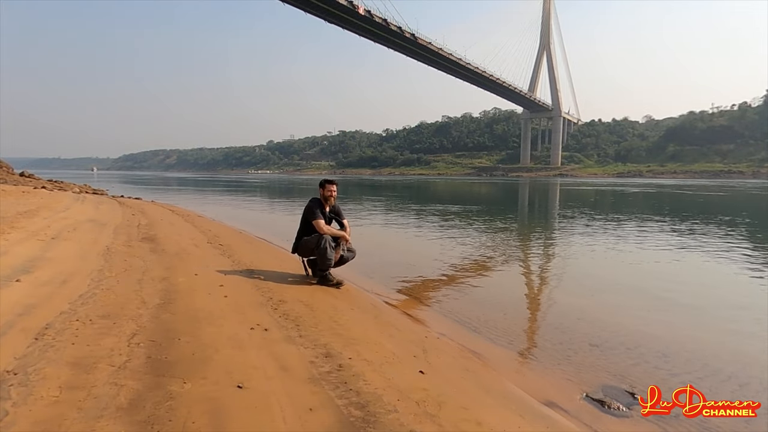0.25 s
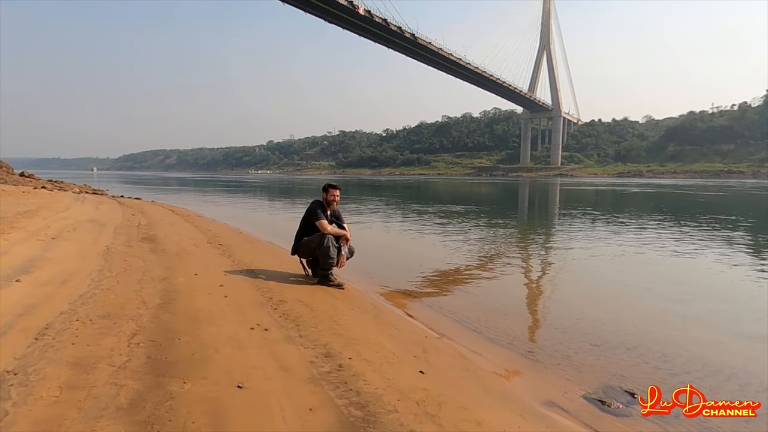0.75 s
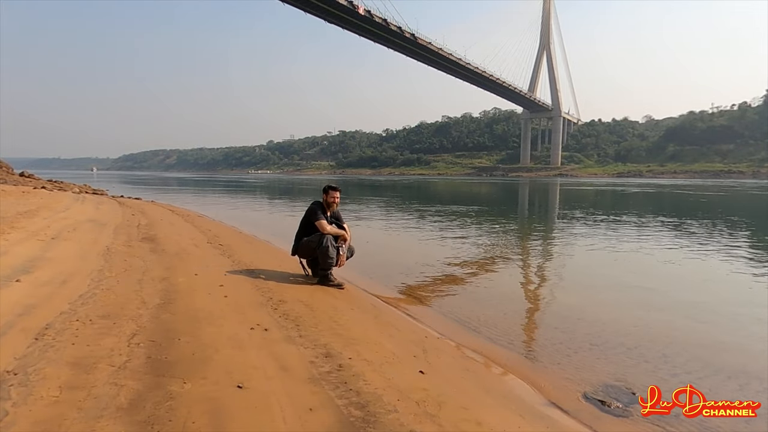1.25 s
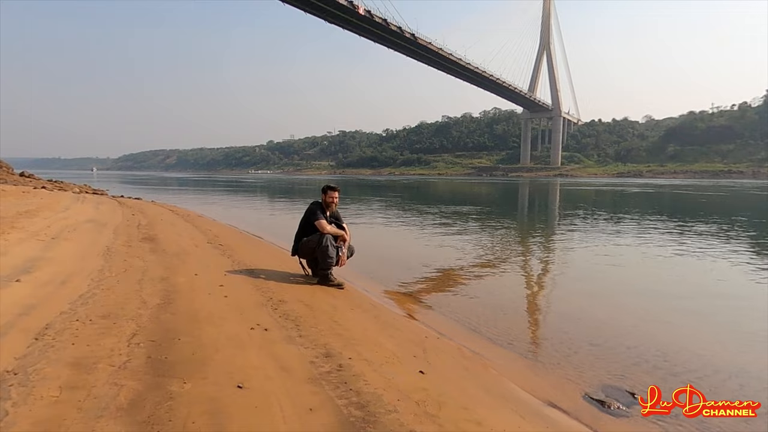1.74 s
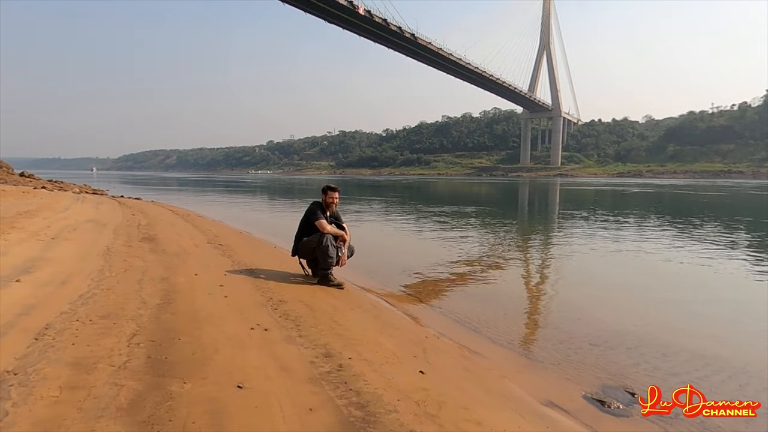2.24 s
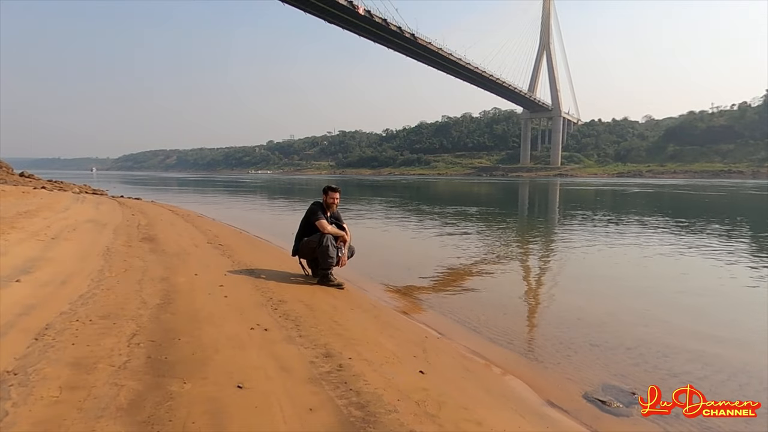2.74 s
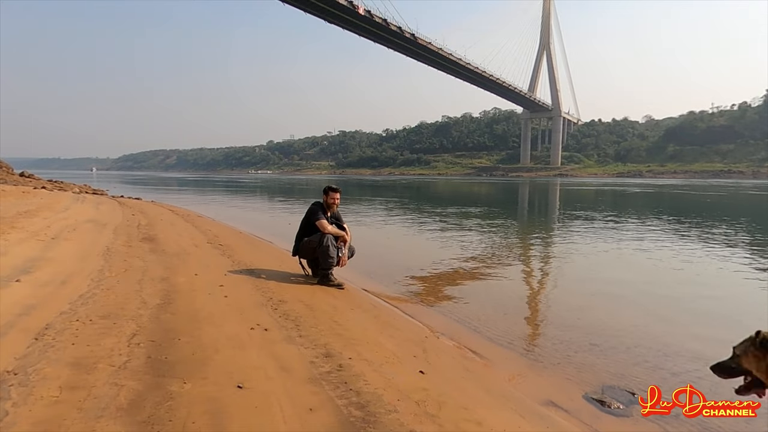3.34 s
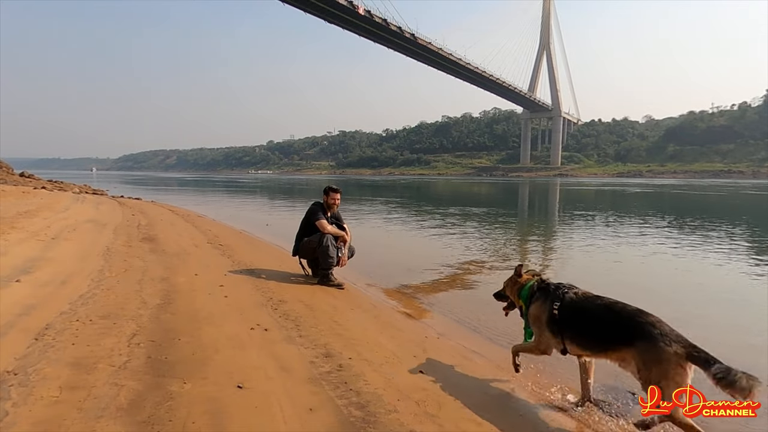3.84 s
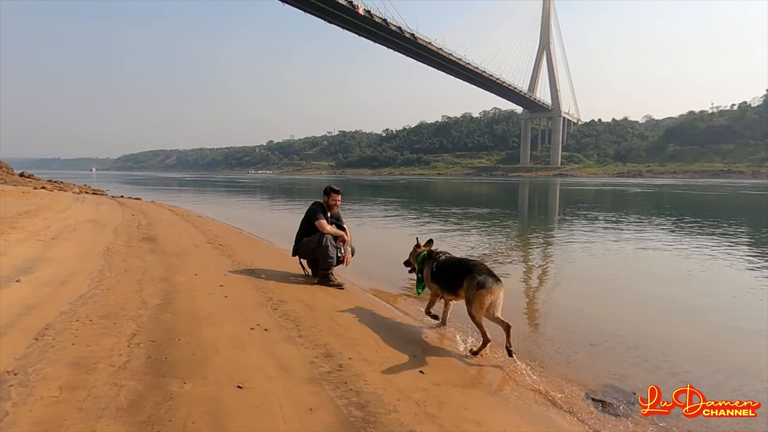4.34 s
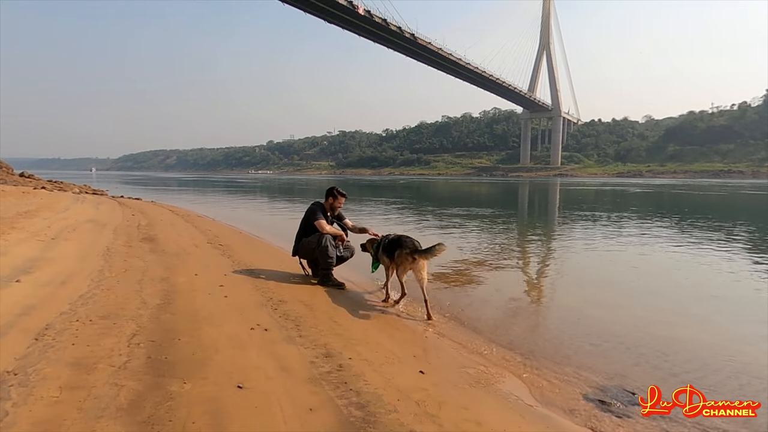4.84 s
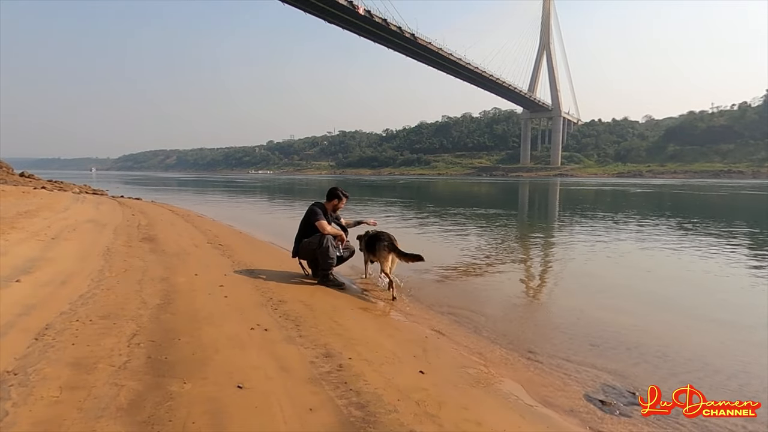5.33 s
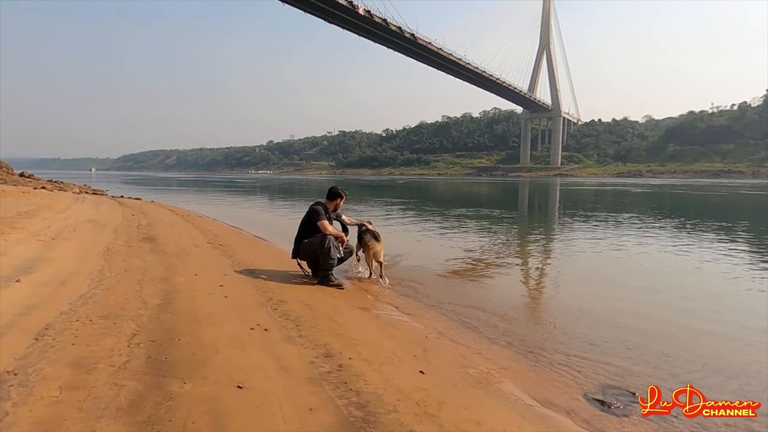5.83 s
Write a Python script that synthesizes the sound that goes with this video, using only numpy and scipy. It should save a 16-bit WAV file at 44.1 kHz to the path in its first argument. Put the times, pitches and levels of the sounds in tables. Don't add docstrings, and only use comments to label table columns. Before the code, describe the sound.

A steady, deep, soft rumble of distant bridge traffic runs throughout, with a faint wavering engine hum and a very quiet river hiss. In front of it a dog moves through shallow water, heard close and to the right. From 0 to 2 seconds there are small separate splashes: a paw slap at 0.1, a crisp drop at 0.4, a firmer slap and low bubbles at 0.8, a gulping plop around 1.25, then light spray and drips. At about 2.3 a hard, sharp slap stands out, followed by ringing plops near 2.6 and 2.95. Splashing thickens from 3 to 4 seconds, with patter, chirping bubbles and bright drops, the strongest smack at 4.0. Meanwhile the sound swings toward the centre. After 4.2 it thins into softer sloshes straight ahead, with a clear bubble plop at 4.6 and scattered drips and gurgles until 6 seconds.

```python
import sys
import numpy as np
from scipy import signal
from scipy.fft import rfft, irfft, next_fast_len
from scipy.io import wavfile
from scipy.ndimage import uniform_filter1d

SR = 44100
rng = np.random.default_rng(int(sys.argv[2]) if len(sys.argv) > 2 else 0)


def how_loud(loudness_db):
    steps = np.asarray(loudness_db, float) / 20
    return 10 ** steps


def waveform_to_disk(signal):
    frames = np.transpose(np.atleast_2d(signal))
    scaled = np.clip(frames, -1, 1) * 32767
    samples = np.round(scaled).astype(np.int16)
    wavfile.write(sys.argv[1], SR, samples)


N = 268128

# (time [s], left minus right [dB])
SIDEWAYS = [
    (0.0, -5.5),
    (0.3, -5.0),
    (0.95, -5.5),
    (2.12, -4.0),
    (2.29, -5.0),
    (3.4, -4.0),
    (4.21, -0.5),
    (6.08, -0.5),
]
# (time [s], peak level [dB], pitch [Hz], life [cycles])
BIG_BUBBLES = [(0.072, -43.5, 790, 6.2), (0.451, -50, 545, 13), (0.467, -40, 550, 5.4),
               (0.472, -46, 820, 5), (0.493, -45, 1190, 6), (0.509, -38.5, 694, 8.6), (0.522, -44, 620, 12),
               (0.702, -41.5, 433, 1.8), (0.825, -34.5, 415, 6.6), (0.858, -41, 420, 9),
               (0.877, -42.5, 417, 26), (0.879, -34, 703, 5.8), (1.194, -38, 684, 16), (1.18, -49, 990, 16),
               (1.2223, -31.5, 1000, 7), (1.23, -35, 1050, 10), (1.24, -38, 523, 7.2),
               (1.262, -38.5, 590, 9), (1.297, -46, 1080, 10), (1.631, -37, 485, 2), (1.919, -40, 980, 8.2),
               (1.945, -33.5, 660, 3.8), (2.533, -34, 1020, 5.8), (2.237, -41.5, 880, 9),
               (2.584, -49, 860, 14), (2.598, -35, 882, 37), (2.62, -23.5, 940, 4.5), (2.93, -37, 687, 7.6),
               (2.942, -35, 647, 8.9), (2.9499, -29, 972, 7.7), (2.976, -43, 780, 7.2),
               (3.036, -43.5, 725, 20), (3.117, -39, 650, 33), (3.323, -39.5, 1090, 23),
               (3.449, -39, 806, 18), (3.847, -34, 845, 13), (4.017, -33.5, 1060, 11),
               (4.614, -30, 1460, 3.8), (4.626, -38, 1530, 10), (4.634, -24, 1440, 10),
               (4.643, -32, 1150, 10), (4.654, -41, 1510, 9.4), (4.666, -51, 1490, 8.3),
               (4.966, -30, 675, 1.3), (5.369, -38.5, 1000, 23), (5.419, -37, 1250, 5.2),
               (5.768, -41, 1080, 4.1), (5.813, -35, 800, 5.5), (5.842, -35.5, 890, 3.6)]
# (time [s], peak level [dB], pitch [Hz])
SMALL_BUBBLES = [(0.0717, -33.5, 1350), (0.126, -37, 1500), (2.16, -30, 1800), (2.259, -25.5, 1370),
                 (2.273, -23, 2510), (2.539, -26, 2320), (2.6248, -22, 1430), (3.12, -23, 1730),
                 (3.1487, -21, 1510), (3.274, -24, 2330), (3.4389, -16.5, 1900), (3.7105, -18.5, 2550),
                 (3.7197, -22, 2330), (3.7217, -24, 1760), (4.023, -23, 1700), (4.0378, -21.5, 1810),
                 (2.1935, -28, 3600), (3.7321, -12.5, 2500), (3.804, -28, 1470), (3.849, -27.5, 1330),
                 (3.896, -23, 1450), (3.9885, -16, 2260), (4.0082, -14, 1580), (4.312, -22, 2120),
                 (4.506, -23, 2200), (3.984, -17.5, 2000), (4.806, -27, 2390), (4.9062, -29, 2430),
                 (5.6982, -24, 2150), (5.831, -24.5, 1890), (5.921, -24, 1660), (5.9446, -22, 1880)]
# (time [s], peak level [dB], pitch [Hz], decay [ms])
DROPS = [(0.073, -16.5, 3740, 23), (0.3993, -7, 4030, 2.7), (0.64, -26, 3800, 48),
         (0.8322, -13.5, 3330, 15), (1.1306, -16, 3220, 22), (1.3954, -18, 4150, 21),
         (1.8148, -15, 4570, 4.9), (1.947, -19, 4710, 3.7), (2.0318, -9, 5900, 2.9),
         (2.1293, -7.5, 5300, 7.3), (2.183, -11.5, 3930, 16), (2.272, -4, 3740, 7.7),
         (2.4992, -11, 3720, 18.5), (2.62, -15, 5100, 16), (2.789, -11, 5130, 6.5), (3.046, -10, 3630, 7.6),
         (3.0966, -11, 3600, 13), (3.391, -4.5, 3640, 11), (3.4685, -8, 4350, 3.2), (3.616, -6, 3640, 2),
         (3.713, -3.5, 3480, 2), (3.895, -10, 3400, 1.5), (3.993, 2, 3480, 1.6), (4.0642, -11.5, 2960, 1.9),
         (4.108, -16, 3850, 2.9), (4.4164, -17.5, 5550, 5.3), (4.568, -21, 3000, 5.5),
         (5.243, -12, 5360, 4.9), (5.8213, -9.5, 5200, 2.8), (6.033, -16, 2800, 8.8)]
# (frequency [Hz], level [dB])
SCATTER = [(30, -14), (70, -27.5), (130, -42), (300, -29), (700, -18), (1400, -14), (4000, -19.5),
           (7000, -16), (8500, -2.5), (14000, -1.5)]


def in_time(rows):
    s, *columns = np.transpose(rows)
    return [np.interp(np.arange(N) / SR, s, column) for column in columns]


def at_hz(points, hz):
    point_hz, value = np.transpose(points)
    return np.interp(np.log(hz), np.log(point_hz), value)


def rms_one(x):
    return x / np.sqrt(np.mean(x ** 2) + 1e-20)


def drift(rate):
    r = np.exp(-80 * np.pi * rate / SR)
    slow = signal.lfilter([1], [1, -2 * r, r * r], rng.standard_normal(N // 40 + 2002))[2000:]
    return np.interp(np.arange(N) / 40, np.arange(len(slow)), rms_one(slow))


def band(x, low, high):
    return signal.sosfilt(signal.butter(2, [low, high], "band", fs=SR, output="sos"), x)


def coloured(x, gains):
    size = next_fast_len(N + 2048)
    hz = np.arange(size // 2 + 1) * SR / size + 1
    return irfft(rfft(x, size) * gains(hz), size)[..., :N]


def add(out, s, sound):
    i = max(round(s * SR), 0)
    out[i:i + len(sound)] += sound[:N - i]


def grains(per_s, spread_db):
    sizes = how_loud(spread_db * np.minimum(rng.exponential(1, N), 4))
    return sizes * (rng.random(N) < per_s / SR)


def swells(s, rise_s, fall_s, db):
    edge_db, roundness = 12.5, 1.72
    t = np.arange(0, N + 32, 32)[:, None] / SR - s
    x = np.where(t < 0, -t / rise_s, t / fall_s)
    return np.sum(how_loud(db - edge_db * x ** roundness) ** 2, axis=1)


def churned_db():
    # (crest time [s], rise [s], fall [s], level [dB])
    gulps = [(.08, 0.033, 0.025, -55), (.465, 0.025, 0.023, -40), (.52, 0.012, 0.013, -38),
             (.75, 0.062, 0.021, -48), (.86, 0.061, 0.071, -35), (1.13, 0.0073, 0.016, -35),
             (1.249, 0.046, 0.034, -26.5), (1.51, 0.12, 0.23, -39), (1.64, 0.029, 0.056, -30),
             (1.95, 0.19, 0.04, -35), (2.14, 0.2, 0.17, -45), (2.265, 0.039, 0.014, -29),
             (2.52, 0.34, .05, -41.5), (2.62, 0.067, 0.054, -32.5), (2.86, 0.2, 0.044, -39.5),
             (2.95, 0.13, 0.1, -36), (3.12, 0.06, 0.13, -36.5), (3.33, 0.34, 0.23, -47),
             (3.45, 0.09, 0.08, -38), (3.77, 0.2, 0.067, -42), (3.86, 0.12, 0.023, -39.5),
             (4.01, 0.13, 0.03, -41), (4.64, 0.024, 0.13, -46.5), (4.995, 0.021, 0.031, -39),
             (5.38, 0.029, 0.035, -38), (5.65, 0.089, 0.25, -43), (5.83, 0.25, 0.036, -40.5),
             (6.02, 0.14, 0.038, -44.5)]
    # (crest time [s], rise [s], fall [s], spray level [dB], slosh level [dB])
    thrown_sheets = [(.1, 0.0075, 0.087, -45.5, -44.5), (0.321, 0.03, 0.059, -36.5, -58),
                     (.45, 0.14, 0.17, -44, -46), (0.719, 0.043, 0.031, -34.5, -49), (.85, 0.17, 0.11, -41.5, -44),
                     (1.0, 0.062, 0.09, -48.5, -50.5), (1.13, 0.084, 0.17, -40, -46),
                     (1.23, 0.03, 0.12, -39, -45.5), (1.41, 0.039, 0.024, -39, -47.5),
                     (1.5, 0.068, 0.12, -37, -46.5), (1.68, 0.18, 0.15, -42, -50), (1.85, 0.087, 0.15, -35.5, -44),
                     (2.02, 0.075, 0.22, -50, -55), (2.17, 0.077, 0.21, -41.5, -47),
                     (2.27, 0.051, 0.028, -38, -55), (2.468, 0.016, 0.14, -36.5, -39.5),
                     (2.63, 0.11, 0.11, -41.5, -48), (2.822, 0.098, 0.16, -35.5, -39),
                     (3.12, 0.14, 0.082, -31.5, -34),
                     (3.31, 0.096, 0.045, -37.5, -39.5), (3.429, 0.11, 0.079, -33.5, -36.5),
             (3.435, 0.051, 0.012, -47, -29), (3.715, 0.018, 0.019, -32, -42),
             (3.6, 0.16, 0.18, -42, -37.5), (3.719, 0.11, 0.086, -37, -36.5),
             (3.82, 0.029, 0.052, -49.5, -45), (3.91, 0.063, 0.1, -41, -42),
             (4.0, 0.041, 0.052, -37.5, -29), (4.14, 0.098, 0.056, -49, -42),
             (4.292, 0.12, 0.068, -37.5, -38), (4.43, 0.087, 0.038, -52.5, -39),
             (4.51, 0.03, 0.025, -43.5, -51), (4.6, 0.054, 0.07, -40.5, -32.5),
             (4.775, .012, 0.071, -50.5, -50), (4.889, 0.14, 0.11, -42, -37), (5.0, .06, 0.049, -49.5, -41),
             (5.259, 0.15, 0.089, -45.5, -38), (5.4, 0.093, 0.065, -47, -32),
             (5.49, 0.02, 0.0081, -52, -50), (5.64, 0.17, 0.12, -45, -38.5), (5.83, 0.11, 0.1, -47, -35),
             (5.94, 0.036, 0.12, -46, -50), (6.039, 0.042, 0.051, -45, -32.5)]
    calm_levels = [-64, -67.5, -63.5]
    stir_levels = [-2.5, -11.5, -36.5]
    slosh_lag_s, stir_rise_s, stir_fall_s = 0.017, 0.003, 0.025
    near_gain = 1.98

    s, rise_s, fall_s, spray_db, slosh_db = np.transpose(thrown_sheets)
    gulp = swells(*np.transpose(gulps))
    slosh = swells(s + slosh_lag_s, rise_s, fall_s, slosh_db)
    spray = swells(s, rise_s, fall_s, spray_db)
    pan_db, = in_time(SIDEWAYS)
    singles = [BIG_BUBBLES, SMALL_BUBBLES, DROPS]
    out = []
    for paw, rows, stir_db, calm_db in zip([gulp, slosh, spray], singles, stir_levels, calm_levels):
        s, db = np.transpose(rows)[:2]
        power = paw + swells(s, stir_rise_s, stir_fall_s, db + stir_db)
        power = np.interp(np.arange(N) / 32, np.arange(len(power)), power)
        calm = how_loud(calm_db - near_gain * pan_db) ** 2
        out.append(10 * np.log10(power + calm))
    return np.array(out)


def churn_db(layers_db, hz):
    centres_hz = [750, 1850, 4500]
    # (frequency [Hz], level per Hz [dB])
    water_colour = [(400, -5), (800, -3), (1300, 0), (2000, -2.5), (2800, -5), (3600, -3), (5500, -5.5),
                    (8000, -10), (16000, -14.5)]
    place = np.interp(np.log(hz), np.log(centres_hz), [0, 1, 2])
    level_db = sum(np.maximum(1 - abs(place - i), 0) * layer for i, layer in enumerate(layers_db))
    width_hz = np.interp(place, [0, 1, 2], [750, 1600, 3300])
    return level_db + at_hz(water_colour, hz) - 10 * np.log10(width_hz)


def churn(layers_db):
    # (frequency [Hz], level [dB])
    sheet = [(500, -8), (2000, -5), (4000, -1.5)]
    edges = 400 * 2 ** np.arange(0, 5.4, 1 / 3)
    clump = how_loud(2.87 * drift(45))
    drops = grains(220 * clump, spread_db=1.5)
    patter = signal.lfilter([1], [1, -how_loud(-60 / (0.036 * SR))], drops)
    white = rng.standard_normal((2, N)) * (rms_one(patter) * 0.48 + 0.47 * clump)
    out = 0
    for k, (low, high) in enumerate(zip(edges, edges[1:])):
        level_db = churn_db(layers_db, np.sqrt(low * high)) + at_hz(sheet, high) + 2.74 * drift(27)
        out = out + how_loud(level_db) * np.sqrt(high - low) * rms_one(band(white[k % 2], low, high))
    return out


def bubble(db, hz, cycles, rise):
    onset_cycles = 2.2
    turns = np.arange(round(cycles / hz * SR)) * hz / SR
    phase = 2 * np.pi * turns * (1 - rise / 4 + rise * turns / cycles)
    fading = how_loud(db - 60 * np.maximum(turns - onset_cycles, 0) / cycles)
    return fading * np.sin(phase) * np.minimum(turns / onset_cycles, 1)


def single_bubbles():
    # (time [s], peak level [dB], pitch [Hz])
    splash_bubbles = [(0.325, -29, 4310), (0.725, -29, 3500), (0.83, -31.5, 1370), (1.4193, -32, 3020),
                      (1.4706, -29, 5030), (1.5257, -30, 4600), (1.717, -31.5, 3380), (1.796, -33, 5250),
                      (2.1833, -35, 2040), (2.2337, -27, 4220), (2.4755, -26, 5770), (2.6207, -29, 3250),
                      (2.6369, -30, 3220), (2.6496, -31, 4070), (2.777, -38, 1200), (2.7905, -30, 2080),
                      (2.8086, -24, 5770), (2.8087, -24, 4910), (2.8126, -25, 3700), (2.8856, -38, 5340),
                      (3.0478, -25, 6630), (3.0975, -27, 5430), (3.1483, -32, 2410), (3.152, -25, 3360),
                      (3.2144, -34.5, 1270), (3.2397, -34, 2080), (3.285, -34, 1400), (3.308, -36, 3300),
                      (3.3423, -29, 4740), (3.393, -31.5, 1810), (3.4026, -22, 3880), (3.4152, -33, 1800),
                      (3.423, -23, 4050), (3.469, -31, 2980), (3.5527, -35.5, 1040), (3.564, -39, 1220),
                      (3.625, -30, 4600), (3.646, -28, 3620), (3.6857, -27, 3790), (3.7038, -31, 5170),
                      (3.7616, -25, 3050), (3.7623, -36, 1460), (3.925, -26.5, 3500), (4.007, -23, 3790),
                      (4.1765, -34, 1580), (4.292, -31, 1930), (4.5838, -39, 2480), (4.641, -27, 2850),
                      (4.863, -34, 2480), (4.923, -32, 4730), (4.943, -31.5, 1310), (4.9902, -33.5, 2330),
                      (5.2537, -31, 2160), (5.29, -34, 1380), (5.3986, -33, 1030), (5.462, -33, 1930),
                      (5.7234, -30.5, 1560), (5.775, -32, 1110), (6.015, -34, 2540), (6.033, -29.5, 1640),
                      (0.086, -39, 4570), (0.1328, -33.5, 1760), (1.022, -37, 1290), (1.173, -30, 3170),
                     (1.4699, -37, 3530), (1.4893, -35, 3530), (1.9114, -36, 3100), (1.9163, -26, 5250),
                     (1.9647, -43, 4620), (1.9835, -34, 3580), (2.1358, -20, 5860), (2.1764, -33, 1190),
                     (2.193, -27, 5250), (2.4702, -33, 5060), (2.482, -35, 2000), (2.6346, -24, 5200),
                     (2.825, -31, 3790), (2.8966, -29, 3970), (3.0868, -33, 3470), (3.176, -32, 4390),
                     (3.3928, -22, 5340), (3.4462, -26, 4910), (3.4782, -31, 6260), (3.5055, -35, 3790),
                     (3.7328, -31, 5170), (3.8838, -29, 3070), (3.906, -29, 2120), (3.907, -27, 3680),
                     (4.1237, -36, 2740), (4.1304, -39, 1710), (4.149, -38, 1970), (4.286, -29, 2920),
                     (4.3334, -35, 1510), (4.5688, -33, 4050), (4.835, -38, 2560), (4.8766, -37, 3790),
                     (4.918, -37, 1290), (4.939, -31.5, 2020), (5.375, -30, 4020), (5.4199, -31, 3360),
                     (5.506, -36, 1460), (5.605, -37, 1550), (6.0231, -33, 4390), (6.034, -30, 5000)]
    out = np.zeros(N)
    for s, db, hz, cycles in BIG_BUBBLES:
        add(out, s - 1 / hz, bubble(db + 8.0, hz, 2.1 * max(cycles, 2), rise=0.096))
    for s, db, hz in SMALL_BUBBLES:
        add(out, s - 1 / hz, bubble(db - 3.0, hz, 17.0, rise=0.25))
    for s, db, hz in splash_bubbles:
        add(out, s, bubble(db + 0.5, hz, 24.0, rise=0.044))
    return out


def fizz(layers_db, count, low_hz, high_hz, size_db):
    when, pitch, size, life, climb = rng.random((count, 5)).T
    starts = (when * N).astype(int)
    pitches_hz = low_hz * (high_hz / low_hz) ** pitch
    sizes_db = size_db + 20 * np.log10(pitches_hz / 1000) - 0.74 * np.log(np.maximum(size, .02))
    levels_db = churn_db(layers_db[:, starts], pitches_hz) + sizes_db
    lives, climbs = 10.1 + 34.6 * life, 0.6 * climb ** 2
    out = np.zeros(N)
    for start, db, hz, cycles, rise in zip(starts, levels_db, pitches_hz, lives, climbs):
        add(out, start / SR, bubble(db, hz, cycles, rise))
    return out


def drop_smacks():
    out = np.zeros(N)
    ms = np.arange(1500) / SR * 1000
    for s, db, hz, decay_ms in DROPS:
        puff, rag = rng.standard_normal((2, 1500))
        ragged = how_loud(1.13 * rms_one(uniform_filter1d(rag, size=40)))
        dying = np.minimum(ms / 3.1, 1) * np.exp(-ms / (0.44 * decay_ms))
        add(out, s, how_loud(db - 12.5) * band(puff * ragged * dying, 0.69 * hz, min(1.89 * hz, 16000)))
        add(out, s, how_loud(db - 15.0) * band(puff * dying ** 2, 1300, 16000))
        add(out, s, bubble(db - 15.0, hz, 21.0, rise=0.034))
    return out


def surface_slaps():
    # (time [s], peak level [dB])
    slaps = [
        (0.0721, -17),
        (0.64, -34),
        (0.832, -17),
        (2.1605, -36),
        (2.2718, -0.5),
        (3.048, -21),
        (5.767, -34),
    ]
    hits = np.full(N, 1e-18)
    s, db = np.transpose(slaps)
    hits[(s * SR).astype(int)] = how_loud(db + 0.5)
    return band(hits, 1100, 6000)


def droplet_ticks(spray_db):
    # (time [s], peak level [dB])
    fine_droplets = [(0.3174, -41), (0.4604, -34), (0.5834, -42), (0.868, -29), (0.9547, -41),
                     (1.083, -25.5), (1.3059, -36), (1.4696, -33), (1.7779, -35), (1.965, -31),
                     (2.0444, -39.5), (2.3142, -27), (2.459, -27), (2.686, -38), (2.8265, -21),
                     (2.9097, -31), (3.2404, -36), (3.478, -25), (3.8748, -37), (4.175, -39), (4.2897, -31),
                     (4.312, -31), (4.3515, -40), (4.922, -32), (5.1934, -36), (5.2769, -33.5), ]
    # (time [s], peak level [dB])
    more_droplets = [(0.1315, -29), (0.6415, -28), (0.8678, -28), (0.8933, -28.5), (1.223, -37),
                     (1.5256, -42), (1.575, -33), (1.668, -33), (1.756, -37), (1.7611, -29), (1.805, -28),
                     (1.818, -27), (1.8972, -21.5), (1.9155, -34.5), (2.136, -35), (2.203, -27),
                     (2.2325, -36), (2.443, -40), (2.4953, -31), (2.6237, -31), (2.729, -28),
                     (2.7374, -27), (2.977, -39), (3.2031, -34), (3.4236, -35), (3.457, -30),
                     (3.4796, -32), (3.8827, -38), (3.9258, -38), (3.9724, -37), (3.9886, -22.5),
                     (4.0076, -27), (4.2926, -28.5), (4.6349, -29), (5.2788, -36), (5.367, -32.5),
                     (5.8411, -27), (6.0242, -32), (6.036, -36)]
    decay_s, snap = 0.00015, 0.97
    hits = grains(130, spread_db=1.5) * how_loud(spray_db + 4)
    for rows, gain_db in [(fine_droplets, 15.5), (more_droplets, 10.5)]:
        s, db = np.transpose(rows)
        hits[(s * SR).astype(int)] = how_loud(db + gain_db)
    dying = signal.lfilter([1], [1, -np.exp(-1 / (decay_s * SR))], hits + 1e-18)
    return band(dying * rng.standard_normal(N) + snap * hits, 3040, 7250)


def splashing():
    layers_db = churned_db()
    gurgle = fizz(layers_db, count=2300, low_hz=372.0, high_hz=2800, size_db=27)
    trickle = fizz(layers_db, count=3500, low_hz=2800, high_hz=8500, size_db=25.5)
    singles = single_bubbles() + drop_smacks() + surface_slaps() + droplet_ticks(layers_db[2])
    return singles + gurgle + trickle + churn(layers_db)


def panned_side(water):
    # (frequency [Hz], share [1 is all, below 0 is reversed])
    shadow = [(900, 0), (1500, .6), (2400, 1.0), (4400, 1.05), (8000, .8), (14000, -.3)]
    pan_db, = in_time(SIDEWAYS)
    lean = np.tanh(pan_db * np.log(10) / 40)
    return lean * coloured(water, lambda hz: at_hz(shadow, hz))


def bank_scatter(water):
    paths = irfft(np.exp(2j * np.pi * rng.random(321)))
    late = signal.fftconvolve(water, paths)[:N]
    return coloured(late, lambda hz: how_loud(at_hz(SCATTER, hz)) / (1 + (1000 / hz) ** 4))


def steady(spectrum, patchy_db):
    edges = np.geomspace(spectrum[0][0], spectrum[-1][0], num=15)
    white = rng.standard_normal((2, 2, N))
    out = 0
    for k, (low, high) in enumerate(zip(edges, edges[1:])):
        hz = np.sqrt(low * high)
        gain = how_loud(at_hz(spectrum, hz) + patchy_db * drift(6.4))
        mid_side = [[1], [how_loud(at_hz(SCATTER, hz))]]
        out = out + gain * band(white[k % 2], low, high) * mid_side
    return out / np.std(out[0])


def bridge_rumble():
    # (frequency [Hz], level per Hz [dB])
    rumble_colour = [(14, -29), (24, -9), (50, -3), (82, 1), (160, 3), (220, -1), (300, -9.5), (420, -17.5),
                     (600, -22.5), (950, -40), (1300, -32)]
    return steady(rumble_colour, patchy_db=2.5) * how_loud(-35.5)


def engine():
    # (order [per turn], level [dB rms])
    orders = [(4, -48), (5, -44), (6, -43.5), (8, -43), (10, -44.5), (12, -50.5)]
    turns = np.cumsum(19.0 * (1 + .007 * drift(.6))) / SR
    out = np.zeros(N)
    for order, db in orders:
        tone = np.sqrt(2) * np.sin(2 * np.pi * (order * turns + rng.random()))
        out += how_loud(db + 1.77 * drift(1.0)) * tone
    return out


def river_hiss():
    # (frequency [Hz], level per Hz [dB])
    hiss_colour = [(590, -27), (1000, 2), (2200, 6), (3570, -8), (5650, -3), (8000, -2), (16500, -8)]
    return steady(hiss_colour, patchy_db=1.2) * how_loud(-66)


def scene():
    water = splashing()
    mid, side = bridge_rumble() + river_hiss()
    mid = mid + engine() + water
    side = side + panned_side(water) + bank_scatter(water)
    return np.array([mid + side, mid - side])


def top_cut(x):
    return signal.sosfilt(signal.butter(12, 15700, fs=SR, output="sos"), x)


def record(dry):
    # (time [s], share [0-1])
    facing = [
        (0.0, 0.02),
        (2.0, 0),
        (2.8, 0.45),
        (3.5, 0.65),
        (3.8, 0.2),
        (4.3, 0.87),
        (6.08, 0.95),
    ]
    # (frequency [Hz], gain [dB])
    flank_treble = [(5000, 0), (6200, -4), (7200, -6), (8000, -14.5), (9400, -13), (11300, -20.5),
                    (12000, -22), (13500, -25.5), (15200, -68)]
    # (frequency [Hz], gain [dB])
    ahead_treble = [(5000, 0), (7700, 0), (8300, -13), (9500, -20), (10200, -34), (10800, -23.5),
                    (12200, -25), (14000, -24), (15400, -43)]
    ahead, = in_time(facing)
    flank = coloured(dry, lambda hz: how_loud(at_hz(flank_treble, hz)))
    front = coloured(dry, lambda hz: how_loud(at_hz(ahead_treble, hz)))
    return top_cut((1 - ahead) * flank + ahead * front)


dry = scene()
out = record(dry)
waveform_to_disk(out)
```